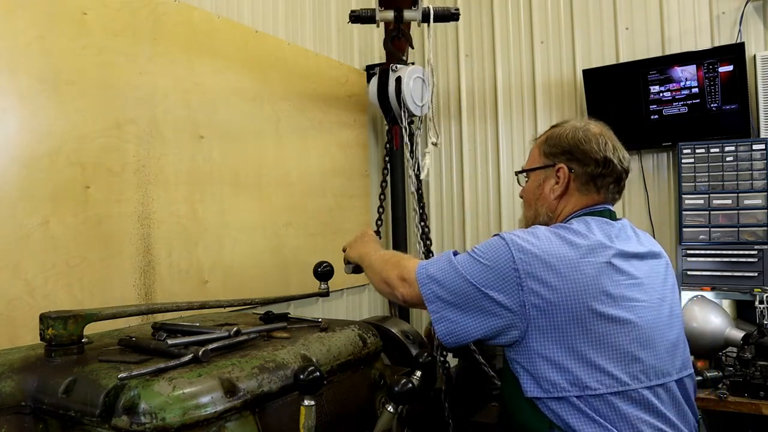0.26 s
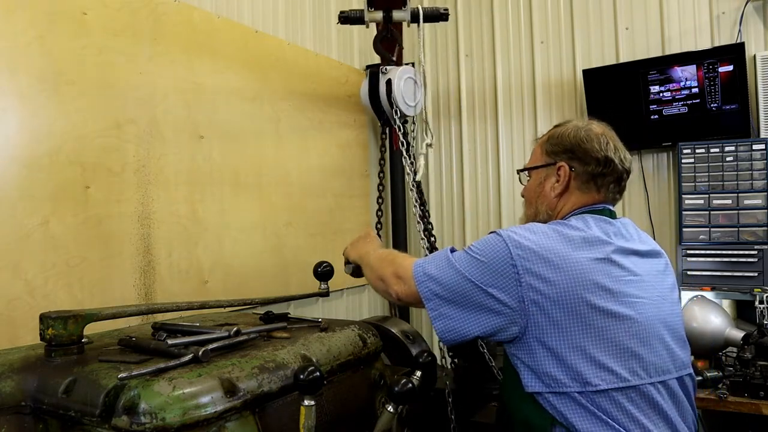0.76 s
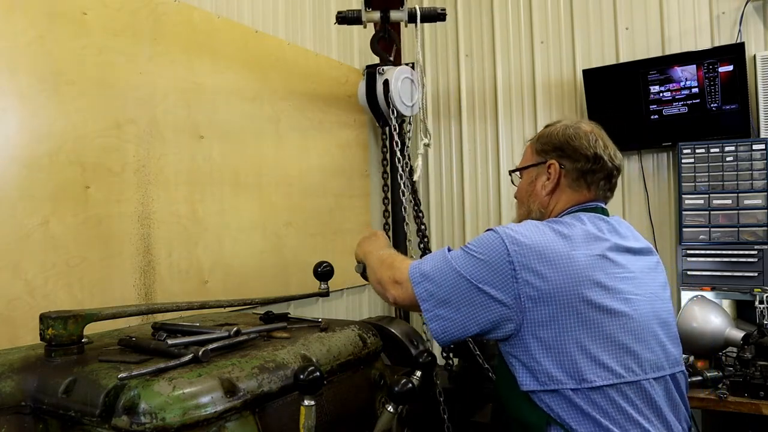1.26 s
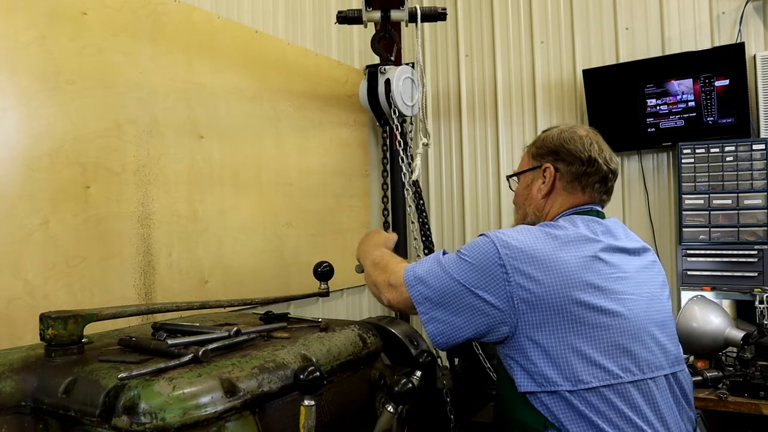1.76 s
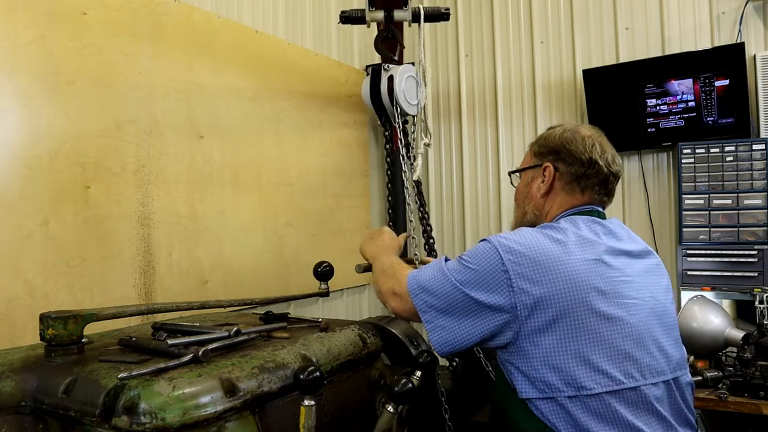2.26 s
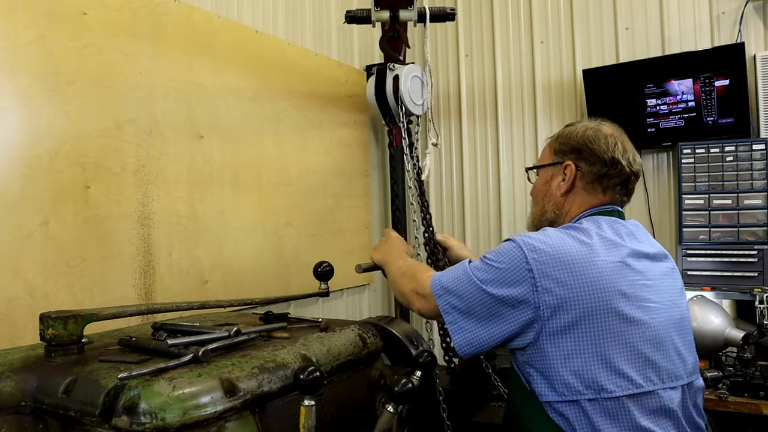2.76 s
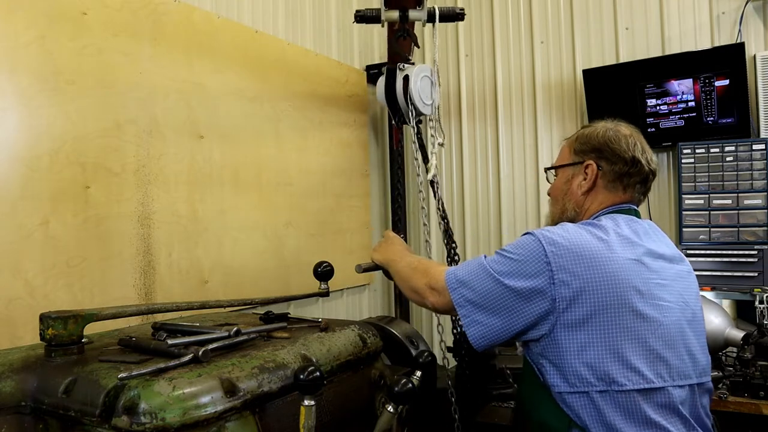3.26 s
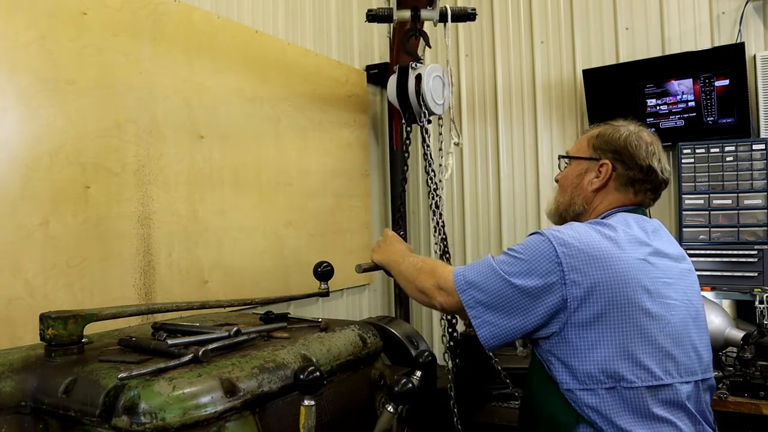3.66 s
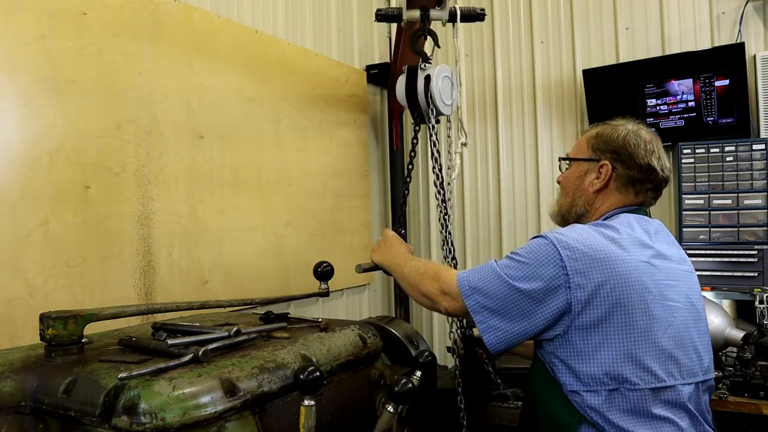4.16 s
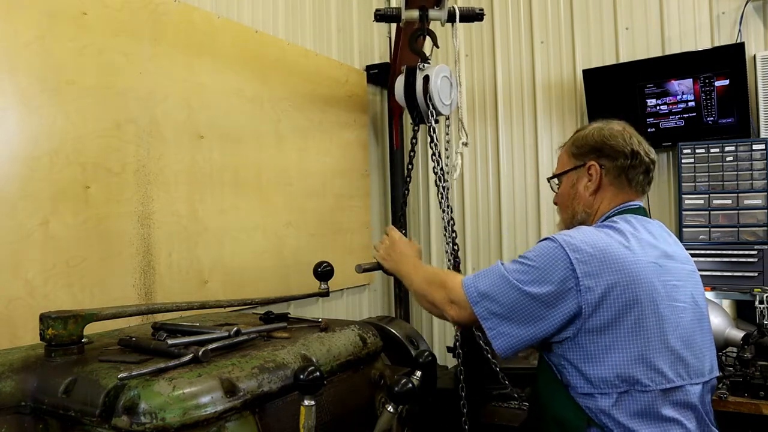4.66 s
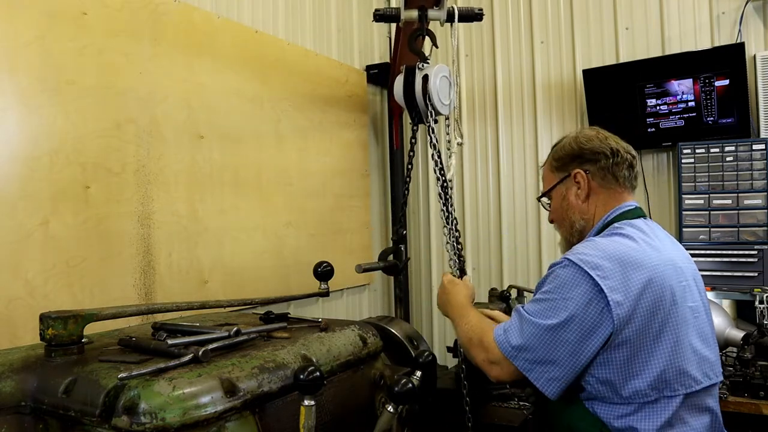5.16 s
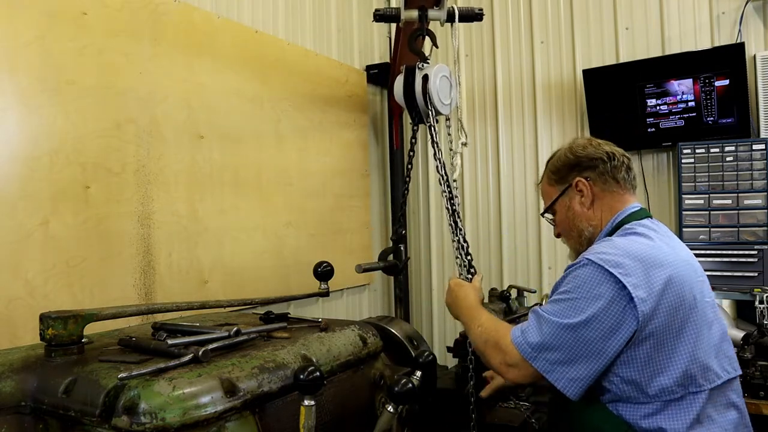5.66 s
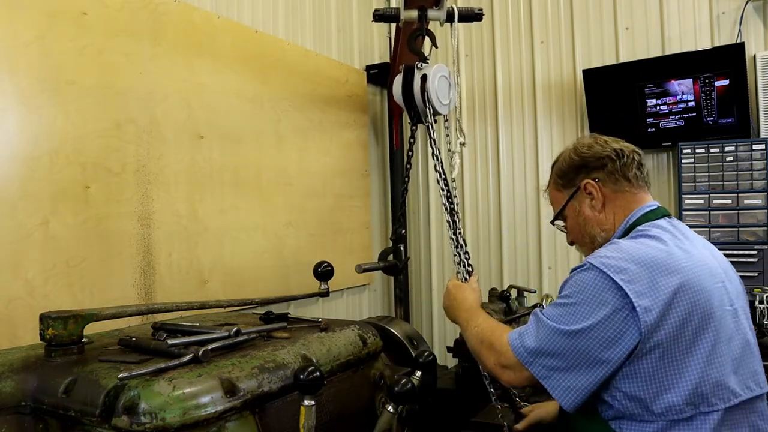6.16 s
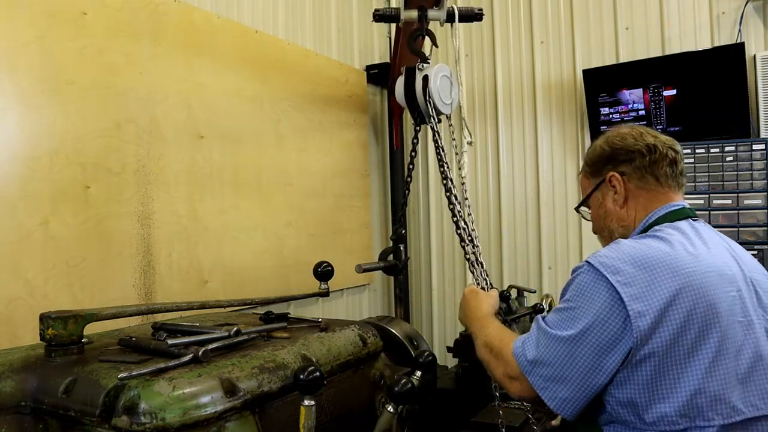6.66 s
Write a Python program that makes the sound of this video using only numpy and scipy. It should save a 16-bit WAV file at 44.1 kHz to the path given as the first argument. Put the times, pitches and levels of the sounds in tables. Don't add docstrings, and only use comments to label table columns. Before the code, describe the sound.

In a sheet-metal workshop, close microphones catch a chain rattling loudly through a manual hoist as a load is let down. A quieter gap brings small clinks and chimes, then blows and scrapes on a ringing steel post. Two lifts follow, a long and a short run of rapid ratchet clacks. Slack links tick faintly until a last cluster of heavy knocks and a struck hook ringing.

```python
import sys
import numpy as np
from scipy import signal
from scipy.fft import rfft, irfft, next_fast_len
from scipy.io import wavfile

SR = 44100
rng = np.random.default_rng(int(sys.argv[2]) if len(sys.argv) > 2 else 0)


def linear_from_db(decibels):
    return 10 ** (np.asarray(decibels, float) / 20)


def master(y):
    cut = np.clip(np.atleast_2d(y).T, -1, 1)
    pcm = np.round(cut * 32767)
    wavfile.write(sys.argv[1], SR, pcm.astype(np.int16))


N = 304731
TIME = np.arange(N) / SR
DECADES = np.log(1000)
CONTACT_EDGES = 1500, 6500, 19000
THUD_TOP_HZ, BODY_TOP_HZ, TREBLE_TOP_HZ = CONTACT_EDGES


def colour(x, table):
    hz, db = np.transpose(table)
    size = next_fast_len(N)
    bins = np.arange(size // 2 + 1) * SR / size + 1
    gain = linear_from_db(np.interp(np.log(bins), np.log(hz), db))
    return irfft(rfft(x, size) * gain, size)[..., :N]


def band(x, lo_hz, hi_hz, order=3):
    return signal.sosfilt(signal.butter(order, [lo_hz, hi_hz], "band", fs=SR, output="sos"), x)


def ring(x, modes):
    out = 0
    for k, (hz, db, t60) in enumerate(modes):
        pole = np.exp((2j * np.pi * hz - DECADES / t60) / SR)
        out = out + (-1) ** k * linear_from_db(db) * signal.lfilter([1], [1, -pole], x).imag
    return out


def bursts(s, db, t60, hold=0.):
    t = np.arange(SR // 4) / SR
    out = np.zeros(N + len(t))
    noise = rng.standard_normal((len(s), len(t)))
    fades, holds, _ = np.broadcast_arrays(t60, hold, s)
    for at, gain, fade, stay, n in zip(s, linear_from_db(db), fades, holds, noise):
        start = int(at * SR)
        decay = np.exp(-DECADES * np.maximum(t - stay, 0) / max(fade, .002))
        out[start:start + len(t)] += gain * n * decay
    return out[:N]


def taps(s, db):
    out = np.zeros(N)
    out[(np.asarray(s) * SR).astype(int)] = linear_from_db(db)
    return out


def grit(per_s, spread_db):
    size_db = spread_db * np.minimum(rng.exponential(size=N), 3)
    x = (rng.random(N) < per_s / SR) * rng.standard_normal(N) * linear_from_db(size_db)
    return x / np.std(x)


def swells(s, db, rise, fall):
    coarse = TIME[::64]
    ahead = np.asarray(s)[:, None] - coarse
    slope = np.where(ahead > 0, np.reshape(rise, (-1, 1)), np.reshape(fall, (-1, 1)))
    gain = linear_from_db(np.reshape(db, (-1, 1)) - slope * np.abs(ahead)).max(axis=0)
    return np.interp(TIME, coarse, gain)


def pocket_drops():
    # t/s, peak level/dB, housing thud level/dB, treble level/dB
    drops = [(0.0144, -21.5, 1, -43), (0.0393, -1.5, -14, -33), (0.0573, 2, -16, -32),
             (0.1074, 5.5, -9, -28), (0.1214, 4.5, -8, -55), (0.1574, 2, -8.5, -8.5),
             (0.2074, 5.5, -15, -25), (0.2444, 2.5, -7, -17), (0.2877, 3, -17, -25.5),
             (0.3044, -22, 9, -24), (0.3244, -20.5, 3.5, 9), (0.3664, 2, -14, -11), (0.3844, -10, -10, -13),
             (0.4044, -3.5, -1.5, -7), (0.4519, -0.5, -8, -12), (0.5033, -3, -9, -20),
             (0.5204, -12, -38, -8), (0.5594, -26, -14, -30), (0.5994, -3.5, -24, -50),
             (0.6444, -11, -6, -31), (0.6864, -15, -25, -21)]
    s, db, thud_db, top_db = np.transpose(drops)
    body = bursts(s, db - 13, 0.086, hold=0.0052) + taps(s, db - 4.0)
    thud = bursts(s, db + thud_db - 2.5, 0.0087, hold=0.0088)
    top = bursts(s, db + top_db - 7.5, 0.012, hold=0.0013) + taps(s, db + top_db + 3.0)
    return thud, body, top


def pawl():
    # t/s, peak level/dB
    teeth = [
        [(3.234, 1), (3.2814, 0), (3.3184, -0.5), (3.3513, -1.5), (3.3807, -2), (3.4096, -2.5), (3.4371, -1),
         (3.463, -4), (3.4885, -3), (3.5114, -3.5), (3.5344, -5), (3.5578, -3.5), (3.5798, -5), (3.6012, -4),
         (3.6237, -3.5), (3.6451, -5), (3.6686, -4.5), (3.6934, -5.5), (3.7214, -3), (3.7554, -3),
         (3.8013, -5.5)],
        [(4.152, 0.5), (4.1974, -1.5), (4.2328, -0.5), (4.2627, -1), (4.2901, -2.5), (4.3176, -2.5),
         (4.3445, -2.5), (4.3705, -6.5), (4.3999, -1), (4.4358, -4), (4.4932, -2)],
    ]
    # gap since last tooth t/s, thud level/dB
    fall_thud = [(0.023, -29), (0.031, -8.5), (.045, -12)]
    s, db = np.transpose(teeth[0] + teeth[1])
    thud_db = np.interp(np.diff(s, prepend=0), *np.transpose(fall_thud))
    snap = bursts(s, db - 11.0, 0.049, hold=0.003) + taps(s, db - 4.0)
    snap += bursts(s + 0.0155, db - 12.5 - 6, 0.036, hold=0.0027)
    frame = band(bursts(s, db - 32.5, 0.11, hold=0.006), 190, 610, order=2)
    chatter = band(bursts(s, db - 30.0, 0.038, hold=0.0031), 1400, TREBLE_TOP_HZ)
    thud = bursts(s + 0.0004, db + thud_db - 8, 0.037, hold=0.0028)
    return thud, band(snap, 1170, TREBLE_TOP_HZ), frame, chatter


def cover_boom():
    # t/s, peak level/dB
    jolts_down = [(0.014, -24), (0.033, -19), (0.056, -9.5), (0.08, -17), (0.109, -13.5), (0.158, -14),
                  (0.2, -12.5), (0.225, -19), (0.245, -12), (0.288, -13), (0.324, -11), (0.344, -10),
                  (0.367, -16.5), (0.387, -20), (0.405, -10), (0.453, -13.5), (0.502, -19), (0.56, -29),
                  (0.604, -22.5), (0.653, -24)]
    jolts_up = [(3.237, -11), (3.284, -7.5), (3.32, -13.5), (3.355, -16.5), (3.383, -13), (3.412, -14),
                (3.438, -21), (3.48, -19), (3.514, -19.5), (3.539, -16), (3.559, -21), (3.583, -23),
                (3.607, -36), (3.629, -28), (3.65, -22), (3.672, -18), (3.732, -21), (3.756, -16),
                (3.8, -16.5), (3.87, -27), (3.975, -31), (4.005, -32.5)]
    jolts_last = [(4.151, -16), (4.2, -24), (4.217, -18), (4.243, -20), (4.266, -18.5), (4.291, -27),
                  (4.32, -13), (4.345, -18), (4.382, -17.5), (4.402, -12.5), (4.438, -18), (4.497, -16.5)]
    # f/Hz, level/dB, t60/s
    cover_tones = [(737, -8.5, 0.052), (805, -4.5, 0.051), (866.6, -0.5, 0.05), (898, -3.5, 0.042),
                   (958, -3.5, 0.046)]
    s, db = np.transpose(jolts_down + jolts_up + jolts_last)
    return ring(band(taps(s, db - 3.5), 500, 1570, order=1), cover_tones)


def wheel_song(grains):
    # t/s, peak level/dB
    sings = [
        [(.05, -33.5), (.162, -27), (.303, -22.5), (.345, -29), (.385, -26), (.51, -34), (3.24, -27),
         (3.42, -31), (3.447, -29.5), (3.512, -28), (3.56, -27), (3.62, -26.5), (3.68, -29.5), (3.76, -31.5),
         (4.17, -31), (4.21, -32), (4.29, -34), (4.335, -33.5)],
        [(.06, -17.5), (.112, -24), (.16, -20), (.213, -23.5), (.25, -19), (.292, -15.5), (.37, -22),
         (.42, -16), (.456, -17), (.51, -28), (3.372, -17), (3.447, -19), (3.512, -16), (3.567, -26),
         (3.62, -25), (3.685, -25), (3.76, -25), (4.175, -27), (4.243, -21), (4.28, -30), (4.33, -23)],
        [(.06, -24), (.17, -25), (.31, -21.5), (.35, -23), (.4, -22.5), (3.4, -24.5), (3.48, -33), (3.57, -25),
         (3.62, -36), (3.71, -26), (3.82, -34), (4.25, -22.5), (4.3, -42), (4.35, -34)],
        [(.07, -27), (.13, -27), (.22, -24), (.3, -22), (.38, -25), (.43, -23), (.53, -23), (.55, -27),
         (.61, -33), (.69, -31.5), (.75, -41)],
    ]
    # f/Hz, level/dB, t60/s
    wheel_tones = [
        [(2458, 7, 0.13)],
        [(3637, -2, 0.11), (3606, -11, .06), (4150, -8, 0.01)],
        [(1338, 0, 0.07)],
        [(3810, 0, .04), (4015, 1, .05), (4175, -2, .035)],
    ]
    out = 0
    for events, modes in zip(sings, wheel_tones):
        s, db = np.transpose(events)
        rub = swells(s, db, 899, 248) * linear_from_db(-28.5) * grains
        out = out + ring(rub + taps(s, db + 4), modes)
    return band(out, 450, 4430, order=2)


def lurch():
    knots = np.arange(0, N / SR + 1, 1 / 14)
    return 2.5 * np.interp(TIME, knots, rng.standard_normal(512)[:len(knots)])


def running():
    hauls = [
        (0.008, 0.44, 0.6, -10.5),
        (3.212, 3.76, 4.05, -23),
        (4.13, 4.35, 4.42, -19.5),
    ]
    rise_db_s, fall_db_s, coast_db = 1497.5, 236, -6
    gain = 0
    for start, ease, stop, db in hauls:
        rise = rise_db_s * np.maximum(start - TIME, 0)
        coast = np.interp(TIME, [ease, stop], [0, coast_db])
        fall = fall_db_s * np.maximum(TIME - stop, 0)
        gain = gain + linear_from_db(db - rise + coast - fall)
    return gain


def hoist():
    # f/Hz, level/dB
    rattle_tone = [(150, -20.5), (370, -7), (600, -9.5), (1150, -4.5), (1500, -7), (4000, 3.5), (8500, -16),
                   (13000, -14), (14600, -38)]
    # f/Hz, level/dB, t60/s
    housing_tones = [(776, -19, 0.079), (825, -6.5, 0.0077), (871, 3.5, 0.045), (936, 2, 0.029),
                     (1300, -38, 0.011), (1333, -3.5, 0.027), (1973, -5, 0.025), (3070, -48, 0.023),
                     (5300, -31, 0.036)]
    pawl_tones = [(4270, 5, 0.005), (4945, -1.5, 0.02), (5330, 6.5, 0.0044), (6550, -7, 0.0074),
                  (7300, -31, 0.0067), (9700, -18.5, 0.029), (10460, -10.5, 0.016), (10860, -11.5, 0.028),
                  (12260, -0.5, 0.0043), (12900, -28, 0.015)]
    drop_thud, body, top = pocket_drops()
    pawl_thud, snap, frame, chatter = pawl()
    grains = grit(4200, 2.0)
    rattle = colour(running() * linear_from_db(lurch() - 6.5) * grains, rattle_tone)
    knock = band(drop_thud + pawl_thud, 677, 1120) + band(body, THUD_TOP_HZ, BODY_TOP_HZ)
    housing = ring(knock + linear_from_db(0.5) * rattle + linear_from_db(7.0) * snap, housing_tones)
    pin_drive = band(body + rattle, 9600, 15000)
    pin = linear_from_db(-34.5) * ring(pin_drive, [(10790, -6.5, 0.067), (10950, -3.5, 0.05)])
    clatter = knock + rattle + frame + cover_boom()
    clatter += band(top, BODY_TOP_HZ, 12700, order=2)
    clatter += linear_from_db(-2.5) * colour(snap, [(1000, -1), (3000, 1.5), (4500, 0.5), (16000, -1.5)])
    clatter += linear_from_db(-36.0) * housing + ring(chatter, pawl_tones) + linear_from_db(-6.0) * pin
    return clatter, wheel_song(grains)


def link_contacts():
    # t/s, peak level/dB, thud level/dB
    knocks = [(0.8812, -31, -9), (0.9523, -26.5, -7.5), (0.9914, -21, -13.5), (1.109, -51, 20.5),
              (1.2075, -23, 0), (1.5524, -32, -21), (1.7085, -30, -1), (1.828, -38, -3), (1.955, -22, -7),
              (1.9657, -23.5, 6.5), (2.0278, -11, -25), (3.071, -35.5, -10), (3.152, -9, -4),
              (4.041, -21, -23), (4.105, -18, -12), (4.718, -31.5, -6), (4.9814, -26, 3.5),
              (5.149, -36, -19), (5.2188, -36.5, -7), (5.3948, -28, 3.5), (5.6915, -31, -1),
              (5.7284, -19.5, -5), (6.1569, -28, -0.5), (6.4671, -23.5, -3), (6.5339, -15, -15),
              (6.6116, 0, -12), (6.628, -4.5, -12), (6.654, -15, -19), (6.6838, -12, -3),
              (6.7487, -11, -8.5)]
    # t/s, peak level/dB, thud level/dB
    clinks = [(1.2895, -38, -6), (1.4538, -40, -5), (1.776, -36.5, -17), (1.968, -25, -20),
              (1.975, -24, -20), (2.088, -19.5, -26), (2.2035, -13, -4), (2.2209, -5, -34),
              (2.6606, -35.5, 1), (2.7326, -26.5, -1), (2.7543, -15, -23.5), (2.9778, -36.5, -13),
              (3.2001, -41, -5), (4.17, -10, -12), (4.6737, -24, -4), (4.7804, -37, -3),
              (5.4878, -45.5, 16), (6.0368, -28.5, -3.5), (6.0682, -32, -18), (6.5137, -11, -15),
              (6.5694, -28, -1)]
    # t/s, peak level/dB
    dry_ticks = [(1.4714, -34.5), (1.733, -36), (1.878, -41), (2.0605, -34.5), (2.2117, -4),
                 (2.4828, -31.5), (4.091, -32), (4.1257, -36), (4.8134, -31), (4.8637, -36), (4.9165, -38),
                 (4.946, -40), (5.118, -39), (5.138, -38), (5.149, -36.5), (5.41, -42), (5.467, -45),
                 (5.316, -42), (5.3494, -41), (5.4227, -36), (5.911, -25), (5.9145, -24.5), (5.993, -39),
                 (6.014, -34), (6.0992, -34), (6.111, -37), (6.332, -39), (6.355, -43), (6.369, -43),
                 (6.4155, -24.5), (6.422, -36), (6.434, -30), (6.435, -31), (6.4405, -25.5), (6.444, -30),
                 (6.46, -30), (6.787, -13.5), (6.795, -3.5)]
    # peak level/dB, thud level/dB
    tick_thud = [(-21, -11), (-11, -54)]
    ticking = [(at, db, np.interp(db, *np.transpose(tick_thud))) for at, db in dry_ticks]
    s, db, thud_db = np.transpose(knocks + clinks + ticking)
    top_db = np.repeat([-29, -13, -2], [len(knocks), len(clinks), len(dry_ticks)])
    clatter_s = np.interp(top_db, [-22, 0], [.1, .008])
    thud = bursts(s, db + thud_db - 7.0, 0.61 * clatter_s, hold=0.27 * clatter_s)
    body = bursts(s, db - 8.5, clatter_s, hold=0.067 * clatter_s)
    edge = bursts(s, db + 0.45 * top_db - 1.5, 1.02 * clatter_s, hold=0.023 * clatter_s)
    treble = bursts(s, db + top_db + 1.5, 0.0065 + 0.39 * clatter_s) + taps(s, db + top_db + 8.5)
    out = band(taps(s, db - 3.5), 1300, 6500, order=1)
    out += band(thud, 396, THUD_TOP_HZ, order=2)
    out += linear_from_db(0.6) * band(body, THUD_TOP_HZ, 4400)
    out += band(edge, 4620, BODY_TOP_HZ)
    return out, band(treble, BODY_TOP_HZ, TREBLE_TOP_HZ)


def scuffs():
    # t/s, peak level/dB, rise/(dB/s), fall/(dB/s), treble level/dB
    shifts = [(.7, -43, 105, 130, -23), (0.851, -52, 900, 81, -33), (1.211, -48, 902, 126, -8),
              (1.971, -54.5, 269, 297, 12), (2.215, -40, 794, 900, 19), (3.213, -26, 251, 703, -8),
              (3.93, -45, 298, 95, -22), (4.132, -37, 220, 422, 5), (4.6, -48, 617, 33, 1.5),
              (5.44, -52, 50, 46, -7), (5.73, -47, 83, 127, -7), (5.91, -47.5, 400, 34, -4),
              (6.08, -45.5, 81, 115, -15), (6.66, -37, 72, 106, 2.5), (6.794, -24, 900, 410, 1),
              (6.84, -47, 500, 203, -35)]
    s, db, rise, fall, top_db = np.transpose(shifts)
    low = swells(s, db + 5.5, rise, fall) * band(grit(4000, 4.2), 304, 4660)
    high = swells(s, db + top_db - 4.0, rise, fall) * band(grit(2600, 1.5), 4560, TREBLE_TOP_HZ)
    return low, high


def chimes():
    # t/s, peak level/dB, pitch f/Hz
    touches = [
        (1.6321, -17, 4060),
        (1.708, -8, 4010),
        (2.752, -18, 6970),
        (3.1505, -10.5, 3720),
        (4.812, -31, 4020),
        (4.893, -33, 4000),
        (5.098, -32.5, 4000),
        (5.218, -28.5, 4000),
        (5.626, -34.5, 3880),
    ]
    # ratio to pitch, level/dB, t60/s
    link_tones = [(.91, 0.5, 0.0094), (0.965, -4, 0.04), (0.998, 3.5, 0.045), (1.0, -20, 0.28),
                  (1.036, -4.5, 0.035), (1.15, -7, 0.008), (2.14, -31, 0.031), (2.7, -25, 0.055)]
    out = np.zeros(N)
    for at, db, hz in touches:
        start = int(at * SR)
        length = min(SR // 2, N - start)
        tap = band(taps([0], db - 13.0)[:length], 0.95 * hz, TREBLE_TOP_HZ, order=1)
        modes = [(min(hz * ratio, .45 * SR), gain_db, t60) for ratio, gain_db, t60 in link_tones]
        out[start:start + length] += ring(tap, modes)
    return out


def slack_chain():
    contacts, ticks = link_contacts()
    low_scuff, high_scuff = scuffs()
    return contacts + low_scuff + chimes(), ticks + high_scuff


def post_blows():
    # t/s, peak level/dB, brightness level/dB
    blows = [
        (1.9804, -16.5, -12),
        (2.0047, -6.5, -33),
        (2.17, -18.5, -22),
        (2.2123, -20, -1.5),
        (2.755, -20, -22),
    ]
    # f/Hz, level/dB, t60/s
    post_tones = [(259, -13, 0.092), (375, -14.5, 0.15), (460, -13, 0.092), (793, -5.5, 0.058),
                  (975, 1, 0.16), (1060, -2.5, 0.056), (1612, -7, 0.18), (1954, 6, 0.076), (2110, -3, 0.24),
                  (2510, -10, 0.13), (3100, -5, 0.067), (3278, -1, 0.18), (4387, 4, .22), (6051, 3, 0.18)]
    # t/s, f/Hz, level/dB, t60/s
    favoured = [(1.957, 974, -35, 0.32), (1.9812, 2105, -21.5, 0.068), (1.9812, 987, -24, 0.16),
                (2.0047, 1963, -11.5, 0.051), (2.0047, 2140, -32, 0.27), (2.0047, 967, -30, 0.19),
                (2.0047, 3650, -9, .015), (2.0047, 6051, -24.5, 0.19), (2.0047, 4430, -23, 0.18),
                (2.0047, 3278, -25, 0.096), (2.0047, 3870, -31, 0.12), (2.0047, 5356, -33, 0.13),
                (2.17, 2012, -21, 0.063), (2.2122, 5230, -8, 0.0053), (2.2122, 9300, -16, 0.0066),
                (2.2112, 6100, -36, 0.26), (2.2112, 2101, -28.5, 0.39), (2.2112, 2580, -24, 0.12),
                (2.2112, 4910, -39, 0.17), (2.2112, 6920, -37, 0.15), (2.2112, 9490, -32, 0.1),
                (2.2112, 968, -30, 0.14), (2.2112, 1614, -40, 0.19), (2.735, 972, -38, 0.12),
                (2.754, 980, -40, 0.12), (2.754, 2910, -22, 0.021), (2.754, 6970, -36, 0.14),
                (2.754, 8400, -37, 0.14), (2.754, 1646, -42, 0.27), (6.613, 1015, -13.5, 0.038)]
    s, peak_db, bright_db = np.transpose(blows)
    crash = band(bursts(s, peak_db - 6.0, 0.13), 790, 4350, order=2)
    soft = band(taps(s, peak_db - 18.5) + taps(s + 0.0059, peak_db - 56.0), 200, 2900, order=2)
    hard = band(taps(s, peak_db + bright_db - 19), 3000, 9000, order=2)
    crack = band(taps(s, peak_db + 2 * bright_db + 30), 1200, 7900, order=1)
    thump = band(bursts(s, peak_db - 11.5, 0.33, hold=0.004), 174, 590, order=2)
    spots = sum(ring(taps([at], 0), [mode]) for at, *mode in favoured)
    return ring(soft + hard, post_tones) + crack + thump + crash + band(spots, 530, 14000, order=2)


def post_scrape():
    # t/s, peak level/dB, rise/(dB/s), fall/(dB/s)
    strokes = [
        (2.398, -38, 712, 203),
        (2.548, -32.5, 280, 90),
        (2.787, -28, 280, 448),
        (3.046, -35, 300, 204),
    ]
    # t/s, peak level/dB
    catches = [(2.386, -38), (2.41, -33.5), (2.507, -39), (2.527, -34), (2.57, -39), (2.603, -35),
               (2.635, -40), (2.765, -31.5), (2.775, -27.5), (2.79, -30.5), (3.029, -47.5), (3.048, -41)]
    # f/Hz, level/dB, t60/s
    damped_tones = [(258, -12, .09), (380, -10.5, 0.075), (458, -10, 0.046), (804, -5.5, 0.033),
                    (950, -0.5, 0.044), (1010, 0.5, 0.025), (1612, -12, 0.088), (2100, -8, 0.082)]
    # t/s, peak level/dB, length t/s
    squeals = [
        (2.505, -33.5, 0.045),
        (2.6, -44, 0.04),
        (3.003, -35.5, 0.028),
    ]
    drag_tone = [(200, -2.5), (450, 5.0), (1000, -2.0), (1600, 1.0), (2100, -11), (3500, -38)]  # f/Hz, level/dB
    drag = colour(swells(*np.transpose(strokes)) * linear_from_db(-30.5) * grit(2400, 3.0), drag_tone)
    drag += band(taps(*np.transpose(catches)) * linear_from_db(1.0), 580, 2800, order=1)
    s, db, length = np.transpose(squeals)
    squeal = band(bursts(s, db - 29.0, 0.025, hold=length), 1560, 4400)
    return ring(drag, damped_tones) + ring(squeal, [(2730, 0.0081, 0.019)])


def hook():
    # f/Hz, level/dB, t60/s
    hook_tones = [(3640, -26, .13), (4362, -27, 0.4), (4290, -38, 0.3), (4330, -3, 0.025)]
    return ring(band(taps([6.793], -3.5), 1700, 7200, order=1), hook_tones)


def room(x):
    # f/Hz, t60/s
    fade_times = [(250, 0.62), (700, 0.41), (1500, 0.46), (4000, 0.53), (10000, 0.47)]
    t = np.arange(SR) / SR
    hz, t60 = np.transpose(fade_times)
    tail = np.zeros(SR)
    for f in 63.3 * 2 ** np.arange(9):
        octave = band(rng.standard_normal(SR), f / 2 ** .5, min(f * 2 ** .5, 18000))
        tail += octave * np.exp(-DECADES * t / np.interp(f, hz, t60))
    tail *= np.clip((t - .004) / 0.00086, 0, 1)
    return signal.fftconvolve(x, tail / np.sqrt(np.sum(tail ** 2)))[:N]


def walls():
    # t/s, peak level/dB
    wall_tugs = [(.11, -28.5), (.31, -35), (.63, -33.5), (1.23, -46), (2.04, -42), (3.19, -35.5),
                 (3.5, -37), (3.8, -40.5), (4.25, -45), (4.6, -47.5), (5.22, -51), (5.45, -43.5),
                 (5.77, -48), (6.65, -30)]
    # f/Hz, level/dB, t60/s
    wall_tones = [(87.1, -5.5, 1), (128.1, -0.5, 0.72), (215, -3, 0.37)]
    x = ring(rng.standard_normal(N), wall_tones)
    shaking = swells(*np.transpose(wall_tugs), 209.5, 77) + linear_from_db(-64.5)
    return x / np.std(x) * shaking * linear_from_db(-11.0)


def air():
    # f/Hz, level/dB per Hz
    hush_tone = [(18, -32), (30, 2.5), (189, -3.5), (311, -2.5), (499, -13.5), (584, -7), (1250, -8),
                 (1720, -18.5), (2350, -14.5), (3980, -16), (16000, -24.5)]
    x = colour(rng.standard_normal(N), hush_tone)
    return x / np.std(x) * linear_from_db(-58)


def scene():
    # f/Hz, level/dB
    room_tone = [(100, 2.5), (1000, -2), (5000, -3), (8000, -0.5), (15000, -7)]
    # f/Hz, level/dB
    stereo_width = [(40, -18.5), (110, -20), (300, -20), (700, -25.5), (1290, -28.5), (4400, -32.5),
                    (8120, -24.5), (15000, -14)]
    slack, ticks = slack_chain()
    clatter, wheel = hoist()
    ringing = linear_from_db(0.5) * (wheel + hook())
    far = clatter + slack + post_blows() + post_scrape()
    wet = colour(far + linear_from_db(0.5) * ticks + ringing, room_tone)
    direct = far + ticks + ringing
    mid = direct + linear_from_db(-3.0) * room(wet) + walls() + air()
    side = colour(linear_from_db(5) * room(wet) + air() + walls(), stereo_width)
    side += linear_from_db(-12) * np.gradient(direct)
    side += linear_from_db(-66.0) * band(rng.standard_normal(N), 4800, 16000, order=2)
    side -= 0.03 * mid
    return np.array([linear_from_db(4.0) * mid + side, linear_from_db(4.0) * mid - side])


def low_pass(x):
    return signal.sosfilt(signal.butter(12, 16460, fs=SR, output="sos"), x)


def record(dry):
    # f/Hz, level/dB
    microphone = [(20, -20), (60, 1), (15400, -3.5), (15800, -71), (16400, -52)]
    held = dry / (1 + (dry / 1.25) ** 8) ** .125
    return low_pass(linear_from_db(0.06) * colour(held, microphone))


dry = scene()
out = record(dry)
master(out)
```